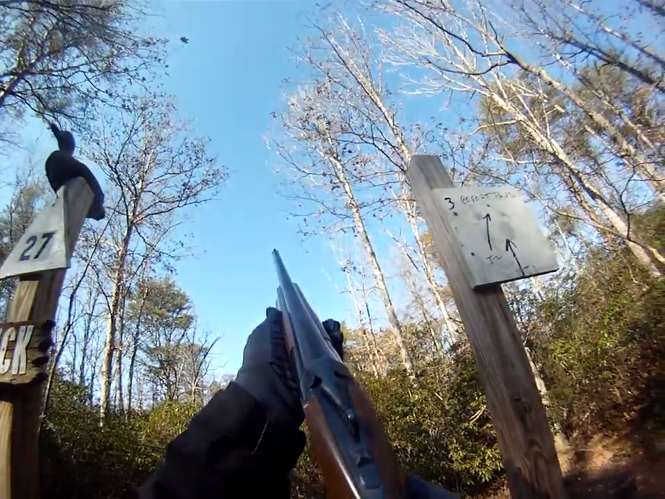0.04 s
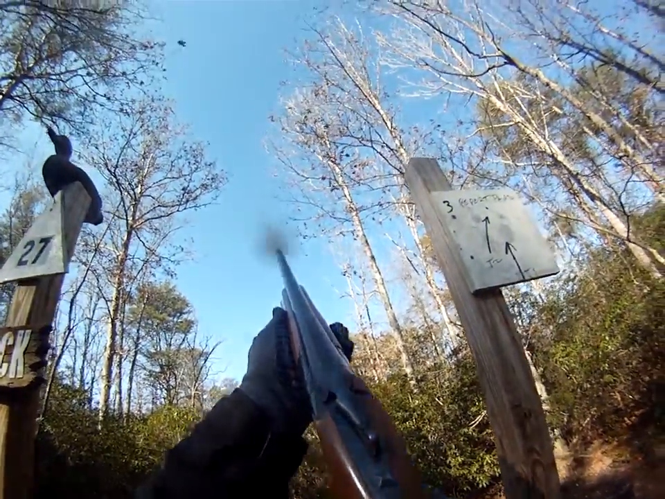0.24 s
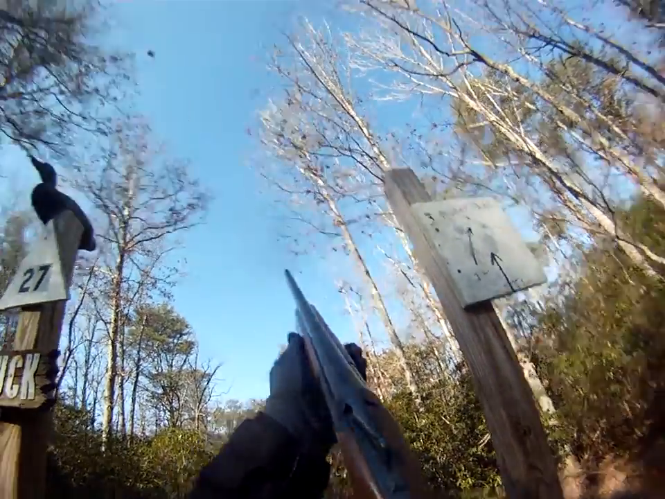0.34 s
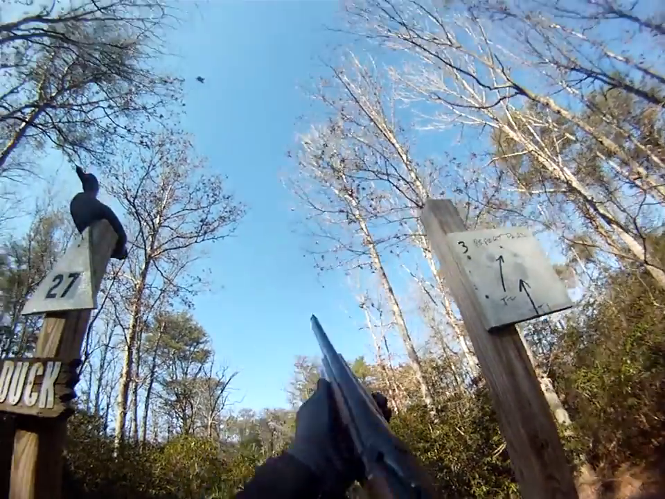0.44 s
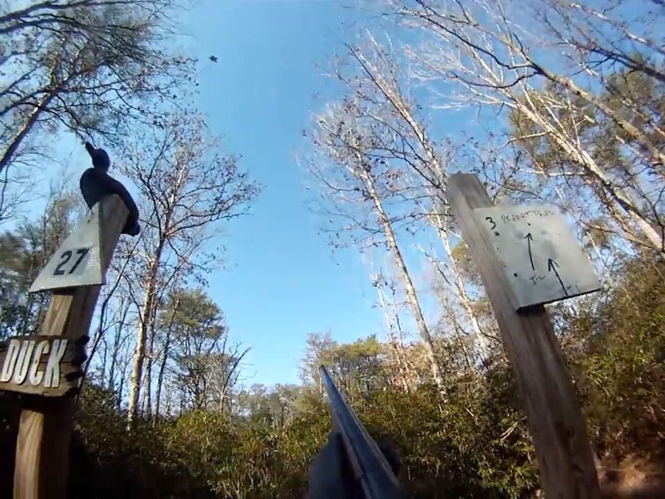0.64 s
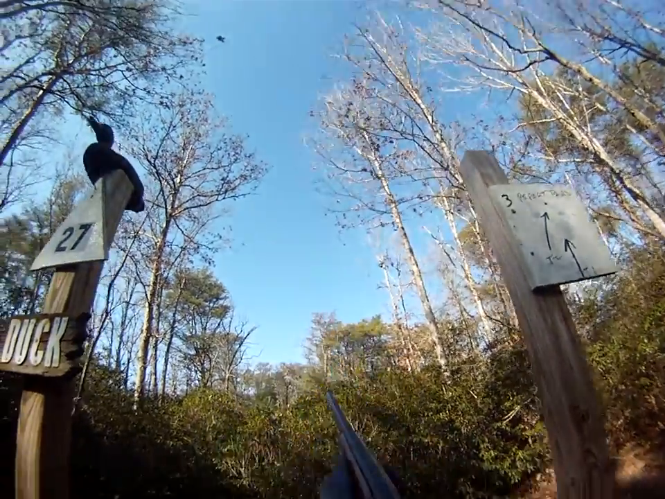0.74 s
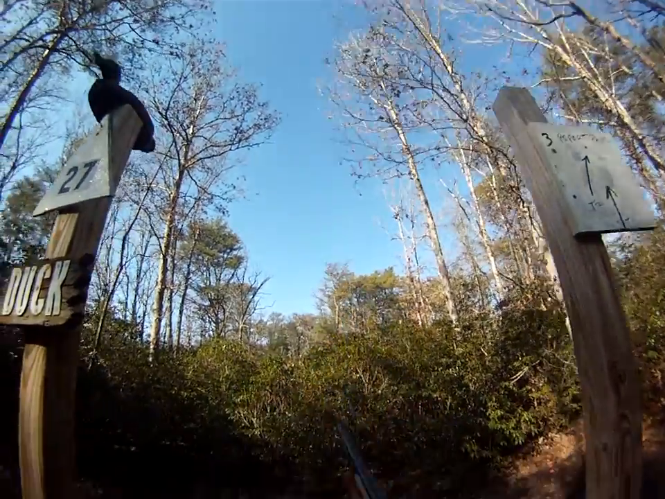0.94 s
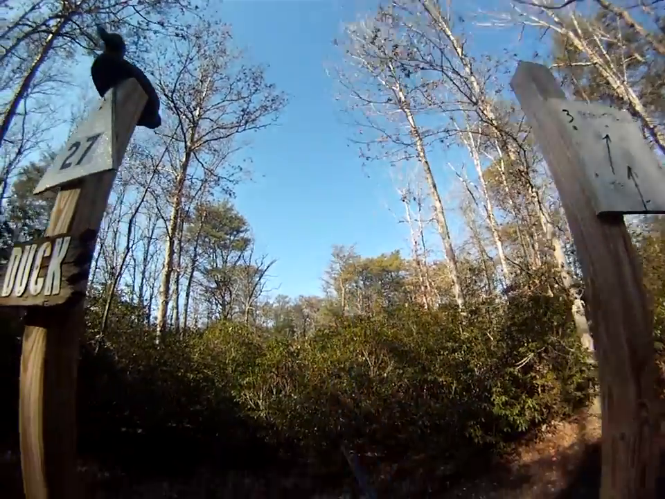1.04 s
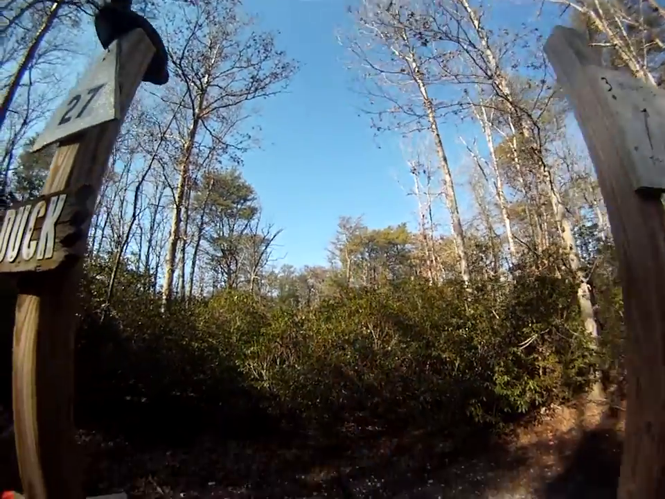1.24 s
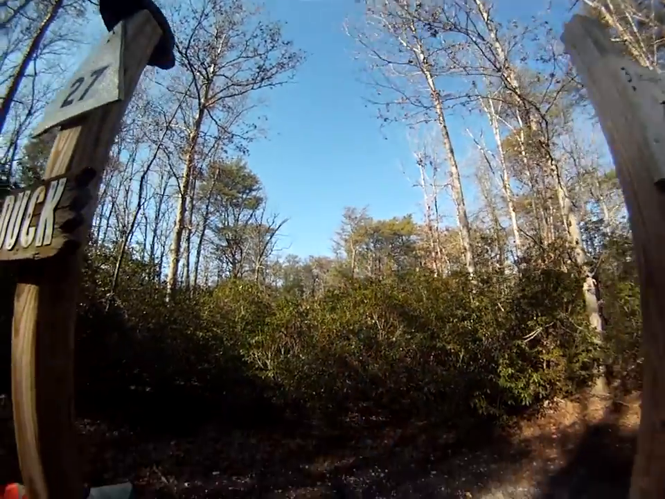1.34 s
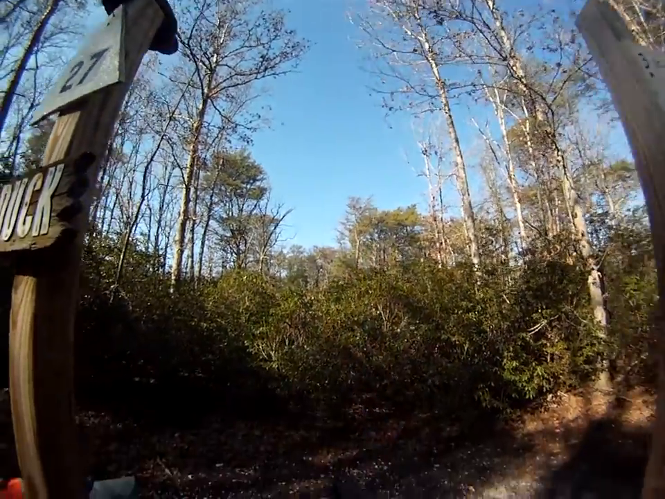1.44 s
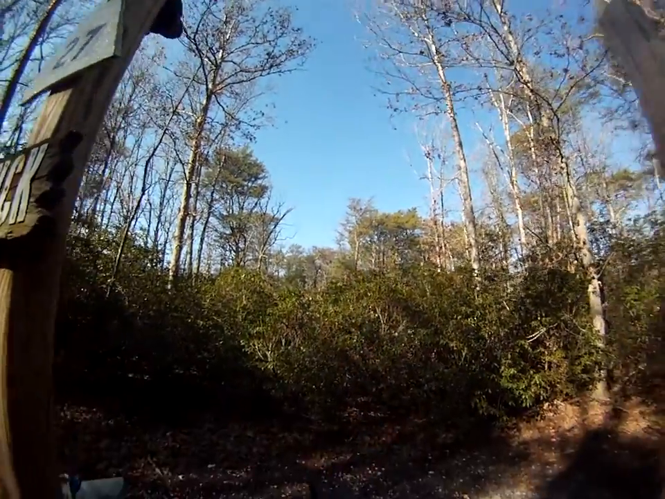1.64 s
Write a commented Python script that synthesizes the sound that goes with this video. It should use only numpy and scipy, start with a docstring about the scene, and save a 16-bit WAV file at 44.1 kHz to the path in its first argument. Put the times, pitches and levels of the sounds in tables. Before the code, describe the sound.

After a moment of still air, one loud shotgun blast fires at about 0.2 seconds, harsh and gritty, overloading the close microphone with a low recoil thump. The gun clacks once just after 0.3 seconds. The echo swells off the trees near 0.45 seconds and fades away by about 1.5 seconds. Faint handling ticks come around 1 second and after, over a soft rumble and hiss.

```python
"""One shotgun shot in bare woods, heard from a small camera worn by the shooter.
The harsh, ringing blast overloads the microphone, the recoil shakes the camera, the gun clacks,
and the trees scatter the report back over still air and faint handling ticks.
The recorder samples slowly and holds each value, which mirrors the midrange into a gritty treble."""
import sys
import numpy as np
from scipy import signal
from scipy.fft import rfft, irfft
from scipy.io import wavfile

SR = 44100
rng = np.random.default_rng(int(sys.argv[2]) if len(sys.argv) > 2 else 0)


def waveform_to_disk(signal):
    """Save audio, clipped to [-1, 1], as 16-bit WAV at the path in sys.argv[1]."""
    frames = np.transpose(np.atleast_2d(signal))
    scaled = np.clip(frames, -1, 1) * 32767
    samples = np.round(scaled).astype(np.int16)
    wavfile.write(sys.argv[1], SR, samples)


N = 74970
T = np.arange(N) / SR
FREQS = np.fft.rfftfreq(N, 1 / SR)

# Levels in spectra (per Hz), partials and modes are relative: they set colour only.
# still air and hiss: f/Hz, level/dB
AIR_SPECTRUM = [(20, 14.5), (35, 23), (55, 17.5), (90, 4), (160, -2), (300, -5.5), (900, -11),
                (1350, -10.5), (1600, -15), (1850, -8), (2100, -4.5), (2600, -14.5), (4000, -16.5),
                (5600, -19)]
# handling ticks: t/s, level/dB, t60/s
TICK_CUES = [(0.023, -54, 0.04), (0.144, -50.5, 0.1), (1.0128, -46.5, 0.028), (1.16, -50.5, 0.05),
             (1.281, -54.5, .03), (1.648, -57, 0.035)]
# colour of the ticks: f/Hz, level/dB
TICK_SPECTRUM = [(300, -14), (900, -9), (1350, -3), (1650, -8.5), (2150, 3), (2800, -12), (3700, -11.5),
                 (5600, -19.5)]
# low pushes on the camera: centre t/s, level/dB, f/Hz, length/s
JOLT_CUES = [(.215, -29.5, 83, 0.0083), (.232, -20, 74.8, .026), (0.252, -23.5, 46, .045),
             (0.304, -31, 60, 0.02), (0.332, -26.5, 30.8, 0.058), (.367, -28, 41, 0.084),
             (0.641, -41.5, 38.9, 0.1), (0.889, -40.5, 38, 0.044), (1.048, -42, 41.5, .06),
             (1.66, -37, 42, .075)]
# rush of gas: f/Hz, level/dB
GAS_SPECTRUM = [(60, -8), (250, -6.5), (420, -15.5), (800, -3.5), (1500, -8), (2200, -3.5), (3000, 0),
                (4000, -3), (5600, -2)]
# brief tones that give the blast its harsh, ringing midrange colour: f/Hz, level/dB
BLAST_PARTIALS = [(610, -18.5), (755, -16), (970, -19), (1235, -13.5), (1385, -17), (1835, -5), (2172, -1),
                  (2385, -4.5), (2890, -10), (3355, -12.5), (3925, -18.5), (4500, -17), (5065, -17.5)]
# echoes off near trunks and brush: f/Hz, level/dB, t60/s
NEAR_SPECTRUM = [(150, -23, 0.65), (400, -17.5, .9), (943, -16, 0.69), (1274, -7.5, 0.47), (1600, -12, .7),
                 (1850, -7.5, .8), (2110, 0.5, .8), (2650, -11, .8), (3134, -13.5, 0.86), (3720, -10, .65),
                 (4142, -16, .6), (4710, -12, .55), (5550, -16.5, .55)]
# echoes off the wall of trees: f/Hz, level/dB, t60/s
TREES_SPECTRUM = [(120, -36.5, 1.5), (300, -18, 1.22), (600, -17, 1.88), (1050, -18, 1.11),
                  (1407, -4.5, 0.92), (1570, -17.5, 1.42), (1860, -3, 0.8), (2130, 2, 0.77),
                  (2480, -10.5, 0.95), (2650, -9, 0.85), (3150, -20.5, 1.12), (3690, -14, 0.54),
                  (4050, -25, 0.89), (4500, -20.5, 0.43), (5650, -26.5, 0.61)]
# duller tail of the deep woods: f/Hz, level/dB
FAR_SPECTRUM = [(120, -22.5), (300, -9.5), (900, -9.5), (1380, -4.5), (1600, -17), (1900, 0), (2200, 3),
                (2450, -11.5), (2660, -10.5), (3000, -20.5), (4000, -28.5)]
# resonances of the gun: f/Hz, level/dB, t60/s
GUN_MODES = [(1460, -24, 0.045), (1880, -5, 0.0072), (2400, -19, .013), (3410, -26.5, 0.024)]

SHOT_S, BUILD_S, HOLD_S = .2258, .0056, .0048   # the blast builds, holds and breaks off
BLAST_END_S = SHOT_S + BUILD_S + HOLD_S
HOLD_RATE_HZ = 12000   # the recorder's slow sample rate


def from_db(db):
    """Decibels to gain."""
    return 10 ** (np.asarray(db) / 20)


def rms_one(x):
    """Scale to unit rms."""
    return x / np.sqrt(np.mean(x ** 2) + 1e-20)


def at_hz(rows, hz, column=1):
    """Read a table column on a log-frequency axis."""
    rows = np.array(rows)
    return np.interp(np.log(hz + 1e-9), np.log(rows[:, 0]), rows[:, column])


def noise(spectrum):
    """Unit-rms noise in the given colour."""
    magnitude = from_db(at_hz(spectrum, FREQS)) * (FREQS > 18) * (FREQS < HOLD_RATE_HZ / 2)
    phases = np.exp(2j * np.pi * rng.random(len(FREQS)))
    return rms_one(irfft(magnitude * phases, N))


def decay(start, t60):
    """Full level until start, then down 60 dB every t60 seconds."""
    return np.exp(-np.log(1000) * np.maximum(T - start, 0) / t60)


def still_air():
    """The bed: a soft rumble with faint hiss."""
    return from_db(-52.5) * noise(AIR_SPECTRUM)


def handling_ticks():
    """Handling makes faint, fast-dying ticks of noise."""
    envelope = sum(from_db(db) * (T >= start) * decay(start, t60) for start, db, t60 in TICK_CUES)
    return envelope * noise(TICK_SPECTRUM)


def camera_jolts():
    """Shock, recoil and handling each rock the camera with a short, low wobble."""
    out = 0
    for centre, db, hz, length in JOLT_CUES:
        window = np.cos(np.pi * np.clip((T - centre) / length, -.5, .5)) ** 2
        out -= from_db(db) * np.cos(2 * np.pi * hz * (T - centre)) * window
    return out


def firing_pin(start=.2235):
    """The pin strikes just ahead of the shot: a tight, bright click."""
    bright = rms_one(np.gradient(noise(GAS_SPECTRUM)))
    return from_db(-16.5) * bright * (T >= start) * decay(start, t60=.012)


def blast(shock_length_s=.0008):
    """An N-shaped shock front cracks; gas rushes and harsh tones swell for a hundredth of a second."""
    ramp = 2 * (T - SHOT_S) / shock_length_s - 1
    shock = -from_db(-1.5) * ramp * (abs(ramp) < 1)
    envelope = (T >= SHOT_S) * decay(BLAST_END_S, t60=.003)
    gas = noise(GAS_SPECTRUM)
    gas /= np.sqrt(np.average(gas ** 2, weights=envelope ** 2))   # unit rms within the burst
    ring = rms_one(sum((-1) ** k * from_db(db) * np.sin(2 * np.pi * hz * (T - SHOT_S))
                       for k, (hz, db) in enumerate(BLAST_PARTIALS)))
    build = np.clip((T - SHOT_S) / BUILD_S, 0, 1)
    ring_gain = from_db(-18.5 * (1 - build ** 2))
    return shock + envelope * (from_db(-8.5) * gas + ring_gain * ring)


def overloaded_mic(pressure, hollow_hz=488):
    """The blast is clipped, then a notch hollows its low mids."""
    notch = signal.iirnotch(hollow_hz, Q=3, fs=SR)
    return signal.lfilter(*notch, np.clip(pressure, -1, 1))


def suction(centre_s=.2338, width_s=.0012):
    """The pressure dips once behind the blast and recovers: the thump."""
    offset = (T - centre_s) / width_s
    return -from_db(-10.5) * (1 - offset ** 2) * np.exp(-offset ** 2 / 2)


def scatter(rows, start, flicker_db=1.5, flickers_per_s=60):
    """Countless echoes: each band flickers on its own and dies at its own rate after start."""
    spectrum = rfft(noise(rows))
    centres = np.geomspace(120, 5600, 16)
    out = 0
    for hz in centres:
        band = irfft(spectrum * np.interp(FREQS, centres, centres == hz), N)
        flicker = np.interp(T * flickers_per_s, np.arange(SR // 100), rng.standard_normal(SR // 100))
        out += band * from_db(flicker_db * flicker) * decay(start, at_hz(rows, hz, column=2))
    return out


def woods(crest_s=.45, rise_s=.096):
    """The report comes back off ground and near trunks, swells off the wall of trees and fades far off."""
    trunks = from_db(-29) * scatter(NEAR_SPECTRUM, BLAST_END_S)
    leaf_litter = from_db(-20) * noise(NEAR_SPECTRUM) * decay(BLAST_END_S, t60=.06)
    deep_woods = from_db(-37) * noise(FAR_SPECTRUM) * decay(crest_s, t60=1.83)
    tree_wall = from_db(-29.5) * scatter(TREES_SPECTRUM, crest_s)
    swell = np.exp(-.5 * (np.minimum(T - crest_s, 0) / rise_s) ** 2)
    return (T >= BLAST_END_S) * (trunks + leaf_litter + swell * (tree_wall + deep_woods))


def gun_clack(start=.335, band_hz=(1250, 3880)):
    """As the recoil ends, one clack rings the gun's short modes."""
    age = np.maximum(T - start, 0)
    ring = sum(from_db(db) * np.sin(2 * np.pi * hz * age) * decay(start, t60)
               for hz, db, t60 in GUN_MODES)
    ring = signal.sosfilt(signal.butter(4, band_hz, "band", fs=SR, output="sos"), ring + 1e-18)
    return from_db(-7.5) * ring / np.abs(ring).max()


def scene():
    """The mono mix: shot, echoes and handling over quiet air."""
    shot = overloaded_mic(blast() + firing_pin()) + suction()
    return (shot + woods() + gun_clack() + handling_ticks() + camera_jolts() + still_air())[None]


def record(dry, input_edge_hz=5685, clip_level=.9, top_hz=15400):
    """Lo-fi grit: sample slowly, clip, hold each value for four steps, cut the top."""
    input_filter = signal.butter(12, input_edge_hz, fs=SR, output="sos")
    slow = signal.resample_poly(signal.sosfilt(input_filter, dry), HOLD_RATE_HZ, SR, axis=1)
    held = np.repeat(np.clip(slow, -clip_level, clip_level), 4, axis=1)
    gritty = signal.resample_poly(held, SR, 4 * HOLD_RATE_HZ, axis=1)[:, :N]
    return signal.sosfilt(signal.ellip(10, .1, 70, top_hz, fs=SR, output="sos"), gritty)


dry = scene()
out = record(dry)
waveform_to_disk(out)
```